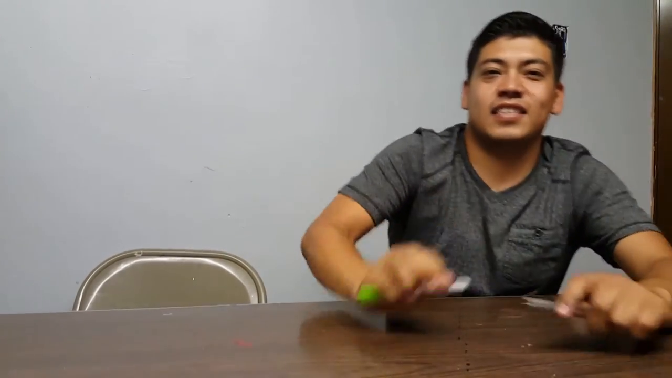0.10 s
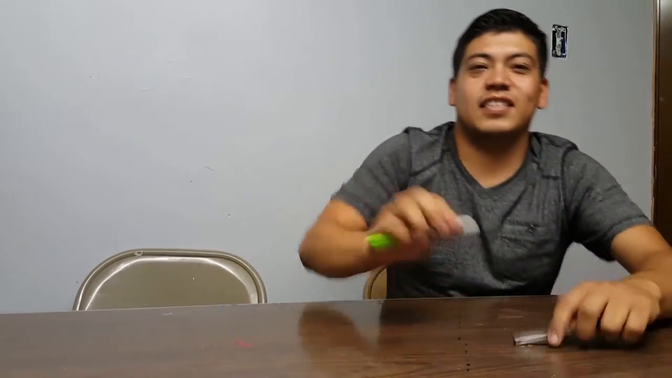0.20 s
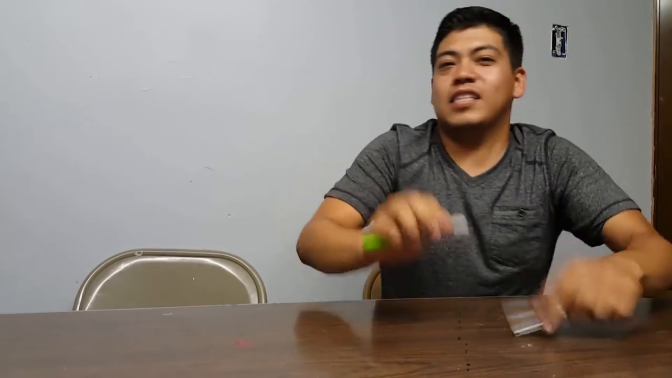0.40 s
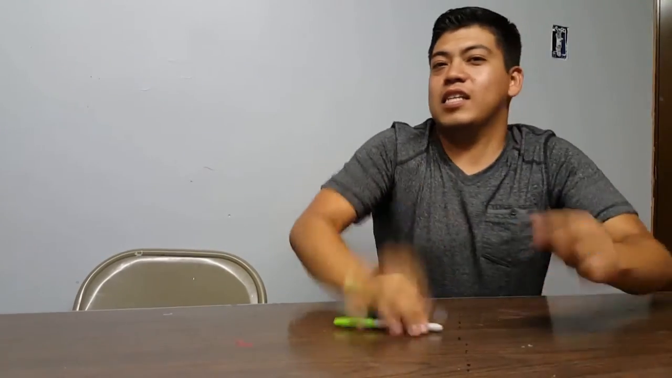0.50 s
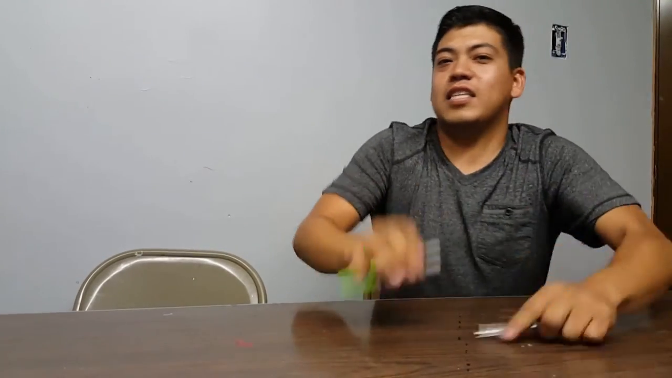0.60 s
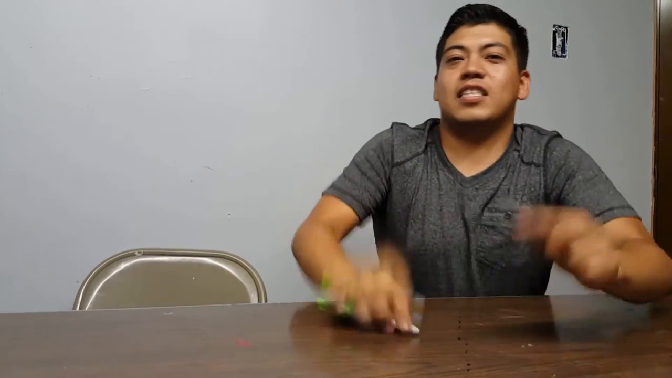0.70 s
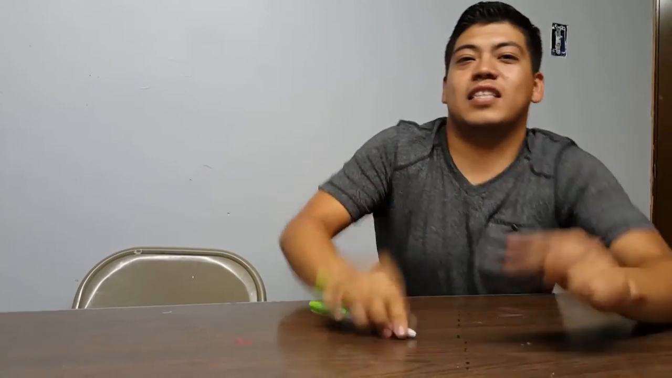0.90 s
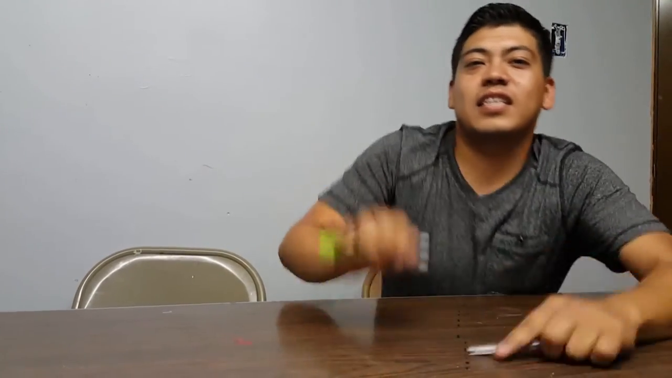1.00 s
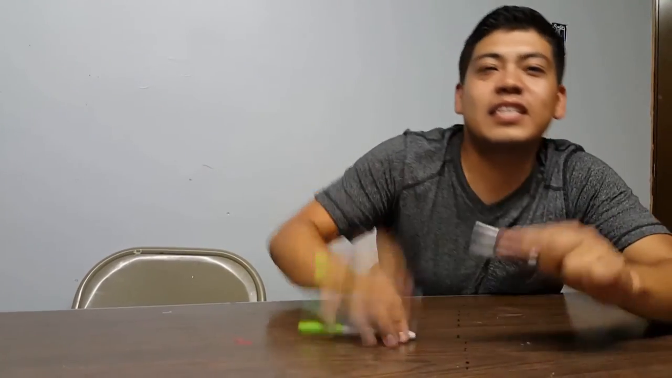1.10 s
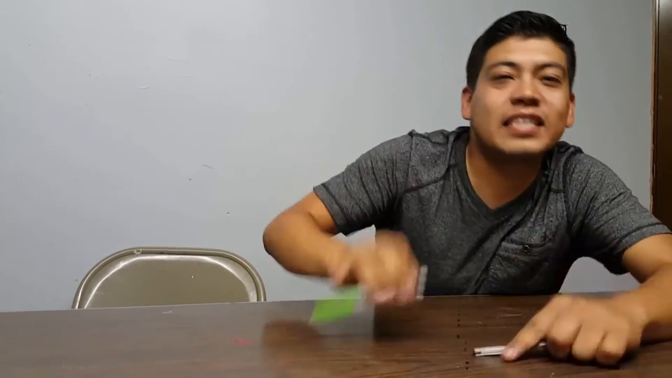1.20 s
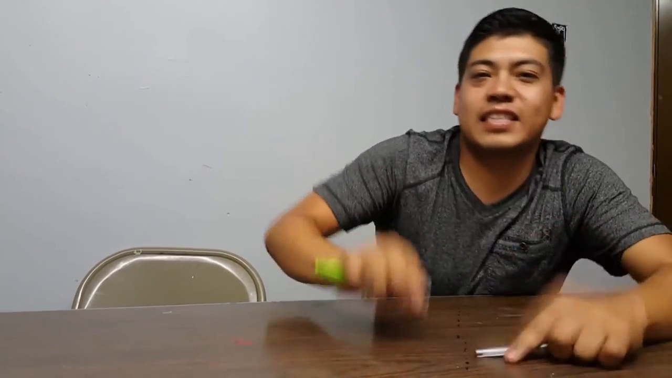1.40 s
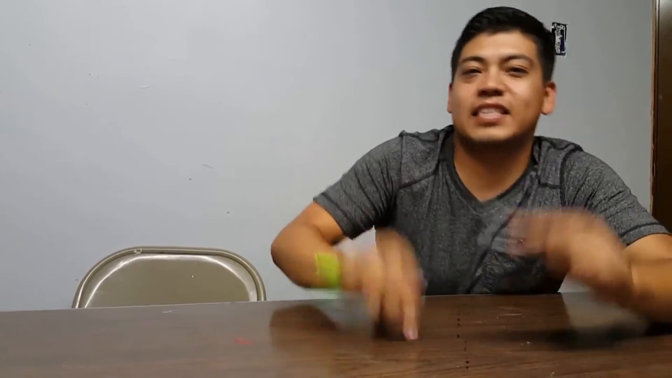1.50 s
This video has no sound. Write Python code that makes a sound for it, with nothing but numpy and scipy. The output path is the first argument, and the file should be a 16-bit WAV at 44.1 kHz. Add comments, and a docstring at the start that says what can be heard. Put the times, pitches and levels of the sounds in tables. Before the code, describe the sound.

Rapid, uneven pen taps play a beat on a wooden tabletop, close by in a small, echoing room. Two deep hand thumps come first among the taps, then a loud flat pen slap, and later a softer, bouncing one.

```python
"""Two pens drum a beat on a wooden table in a small bare room whose walls throw every blow back.
A pen tip opens: the plastic ticks, then the wood knocks and thuds. In the first half second the heel
of a hand thumps the table twice, and it booms and rattles. The tips keep tapping. At 0.7 s a pen is
slapped down flat with a loud crack; at 1.3 s comes a softer slap that bounces twice. The last tap
falls at 1.5 s and dies away into the hush of the room."""
import sys
import numpy as np
from scipy import signal
from scipy.fft import rfft, irfft
from scipy.io import wavfile

SR = 44100
rng = np.random.default_rng(int(sys.argv[2]) if len(sys.argv) > 2 else 0)


def dump_mix(stems):
    """Bounce the given channels to the path in sys.argv[1] as a 16-bit WAV at rate SR."""
    frames = np.atleast_2d(stems).T  # one column per channel
    limited = np.clip(frames, -1, 1)  # hard clip at full scale
    pcm = np.round(limited * 32767).astype(np.int16)
    wavfile.write(sys.argv[1], SR, pcm)


N = 68355
TIME = np.arange(SR) / SR  # one second

# Pen taps; the wood's pitch depends on where the tip lands. Each row: start in seconds, which pen,
# tick in dB, knock in dB, knock pitch in Hz, thud in dB, thud pitch in Hz, left minus right in dB.
TAPS = [(0.0466, "right", -12.5, -19.5, 646, -1.5, 235, 4),
        (0.2447, "right", -15.5, -25.5, 970, -12, 201, 1.5), (0.3081, "left", -26, -23, 1140, -51, 200, -6),
        (0.3945, "left", -22.5, -24, 1080, -38, 200, -2.5),
        (.4470, "right", -17, -21.5, 930, -23, 208, 0.5), (0.5018, "left", -8, -35, 1066, -31, 204, 4.5),
        (.6003, "left", -11, -19, 1151, -6, 199, 1.5), (0.6846, "right", -7, -11, 940, -20, 207, 2),
        (0.7668, "left", -13, -19, 1240, -6, 207, -3), (.8950, "right", -24, -26, 554, -12.5, 104, 1),
        (0.9876, "left", -17.5, -23.5, 1020, -18.5, 129, -3),
        (1.0881, "right", -29, -24.5, 510, -15, 217.5, -0.5),
        (1.1712, "left", -18, -24, 1234, -12, 222, -2), (1.2927, "right", -18, -23, 600, -8, 245, 1.5),
        (1.3752, "left", -10.5, -20, 1050, -7, 244, -3), (1.5120, "right", -25, -28.5, 1150, -12, 253.8, 1)]
# The tone of each pen's tick. Each row: frequency in Hz, level in dB.
TICK_TONE = {"right": [(300, -19.5), (1200, -3), (2300, 2), (3500, 2.5), (5200, 4), (8300, 3.5),
             (10500, -9.5), (12500, -8), (16000, 9)], "left": [(300, 7.5), (1800, -35.5), (3100, -5),
             (4300, -7), (6000, -5.5), (8500, -1.5), (10500, -10.5), (13500, -8.5), (16000, 6.5)]}
# The ring of each pen's barrel. Each row: pitch in Hz, dB relative to the tick, t60 in seconds.
# A t60 is the time a sound takes to fade by 60 dB.
BARREL_RING = {"right": (3526, -10.5, 0.0045), "left": (3034, -19.5, 0.015)}
# The tones of the wood's knock and thud. Each row: multiple of the pitch, level in dB.
KNOCK_TONE = [(.15, -16.5), (.45, -3), (.7, -1), (1, 2), (1.5, -7.5), (2.2, -8.5), (3.5, -24.5),
              (10, -40.5)]
THUD_TONE = [(.15, -74.5), (.35, -22.5), (.55, -6), (.8, 1), (1.15, -0.5), (1.6, -9.5), (2.3, -18),
             (3.6, -31), (9, -50.5), (35, -41)]
# For each pen: seconds from its tick until the wood answers.
WOOD_DELAY_S = {"right": .001, "left": .0045}
TICK_T60_S, TICK_SCATTER = 0.012, 1.2
HAND_DAMPING_DB_PER_S = 51  # resting hands quiet the table top


def pen_taps():
    """The plastic tip ticks first; a moment later the wood knocks, thuds and booms."""
    ticks, knocks, thuds, boom = np.zeros((4, 2, N))
    damped_ring = unit(table_ring("tip", rise_s=0.0075) * amp(-HAND_DAMPING_DB_PER_S * TIME))
    for s, pen, tick_db, knock_db, knock_hz, thud_db, thud_hz, pan_db in TAPS:
        add(ticks, s, amp(tick_db) * blow(TICK_TONE[pen], TICK_T60_S, TICK_SCATTER), pan_db)
        barrel_hz, barrel_db, barrel_t60 = BARREL_RING[pen]
        add(ticks, s, amp(tick_db + barrel_db) * ping(barrel_hz, barrel_t60), pan_db)
        wood_s = s + WOOD_DELAY_S[pen]
        add(knocks, wood_s, amp(knock_db - 6.5) * ping(knock_hz, t60=0.019))  # the wood's short note
        add(knocks, wood_s, amp(knock_db) * blow(pitched(KNOCK_TONE, knock_hz), t60=0.034, scatter=5.9))
        add(thuds, wood_s, amp(thud_db - 7) * click(pitched(THUD_TONE, thud_hz)))
        add(boom, wood_s, amp(thud_db - 3) * damped_ring)
    return room(ticks, tail_db=-5) + room(knocks, tail_db=-6) + room(thuds, tail_db=-2.5) + boom


# Flat slaps and bounces. Each row: start in seconds, then crack, push, tick and left minus right in dB.
SLAPS = [(0.691, 5.5, 7, -3.5, 1.5), (1.3002, -13, -21, -10.5, 11), (1.3071, -17, -41, -47, 2),
         (1.3160, -22, -27, -25, -18.5)]
# The tones of the crack and of the deep push on the table. Each row: frequency in Hz, level in dB.
CRACK_TONE = [(60, -47.5), (250, 7.5), (600, 2.5), (1000, 3), (1450, 4), (2000, -5), (2600, -2.5),
              (4000, -20), (6000, -28.5), (8500, -23.5), (10500, -26), (15000, -13)]
PUSH_TONE = [(20, -50), (50, 0.5), (100, 0.5), (190, 3), (350, -5), (700, -9), (2000, -38.5), (8000, -80)]


def pen_slaps():
    """The whole barrel cracks on the wood and pushes the top down."""
    cracks, pushes = np.zeros((2, 2, N))
    for s, crack_db, push_db, tick_db, pan_db in SLAPS:
        add(cracks, s, amp(crack_db) * blow(CRACK_TONE, t60=0.016, scatter=0.62), pan_db)
        add(cracks, s, amp(tick_db) * blow(TICK_TONE["right"], TICK_T60_S, TICK_SCATTER), pan_db)
        add(pushes, s, amp(push_db) * click(PUSH_TONE))
    return room(cracks, tail_db=-8) + room(pushes, tail_db=-14.5)


# Hand thumps. Each row: start in seconds, level in dB, rattle in dB, rattle length in seconds.
THUMPS = [(0.2449, 13.5, -42, 0.182), (0.4474, 14, -38.5, 0.276)]
# The tones of the hand's heel and of the rattle. Each row: frequency in Hz, level in dB.
HEEL_TONE = [(20, -44), (60, 5.5), (110, 3.5), (180, 7.5), (300, 0), (450, -9), (800, -19.5), (2000, -37),
             (8000, -46)]
RATTLE_TONE = [(100, -3), (450, 12), (800, 1.5), (1300, -0.5), (2000, -9.5), (2700, -12), (4000, -18),
               (8000, -25), (11000, -38), (15000, -33)]
RATTLE_HITS_PER_S, RATTLE_RISE_S, RATTLE_RELEASE_S, RATTLE_FADE_DB_PER_S = 2500, 0.0052, 0.018, 30.5


def hand_thumps():
    """A soft, heavy blow sets the table booming and its loose parts buzzing."""
    blows, boom, rattle = np.zeros((3, 2, N))
    for s, db, rattle_db, rattle_s in THUMPS:
        add(blows, s, amp(db - 15) * click(HEEL_TONE))
        add(boom, s, amp(db + 0.5) * table_ring("hand", rise_s=0.0069), pan_db=1.6)
        tiny_hits = wide_noise(SR) * (rng.random(SR) < RATTLE_HITS_PER_S / SR)
        buzz = np.sqrt(SR) * unit(shape_tone(tiny_hits, RATTLE_TONE))
        rise = 1 - np.exp(-TIME / RATTLE_RISE_S)
        fade = amp(rattle_db - RATTLE_FADE_DB_PER_S * TIME)
        release = np.exp(-np.maximum(TIME - rattle_s, 0) / RATTLE_RELEASE_S)
        add(rattle, s, rise * fade * release * buzz, pan_db=1.5)
    return room(blows, tail_db=6) + boom + room(rattle, tail_db=-3.5)


# The table's own notes. Each row: pitch in Hz, dB under the hand, dB under a pen tip, t60 in seconds.
TABLE_NOTES = [(73.4, -12, -48, 0.31), (86.7, -11, -26, 0.5), (124.6, -4, -23, 0.41),
               (145.4, -5, -38, 0.59), (153.7, 2.5, 0.5, 0.27), (167.94, -7.5, 0.5, 0.38),
               (209.4, -2.5, 1, 0.28), (223, -0.5, 4, 0.3), (249.95, -8, -0.5, 0.4),
               (267.8, -10, -5.5, 0.41), (316, -29, 0, 0.13), (315.3, -9.5, -8.5, 0.28),
               (357.4, -20.5, -16, 0.64), (435, -21, -17.5, 0.65), (490, -22, -20, 0.47),
               (560.5, -29.5, -14, 0.47)]


def table_ring(striker, rise_s):
    """The table top rings with many notes, building up as the blow spreads through it."""
    ring = np.zeros(SR)
    for hz, hand_db, tip_db, t60 in TABLE_NOTES:
        db = hand_db if striker == "hand" else tip_db
        ring += amp(db - 60 * TIME / t60) * np.sin(2 * np.pi * hz * TIME)
    return unit(ring * (1 - np.exp(-TIME / rise_s)))


def blow(tone, t60, scatter):
    """A click, then the brief, noisy ring of the struck parts; scatter is that ring's strength."""
    hit = scatter * unit(wide_noise(4096) * amp(-60 * TIME[:4096] / t60))
    hit[1, 0] += 1  # the click reaches the right microphone first
    hit[0, round(0.00007 * SR)] += 1
    return unit(signal.fftconvolve(hit, click(tone)[None], axes=1))


def ping(hz, t60):
    """One quickly dying note."""
    return unit(np.sin(2 * np.pi * hz * TIME) * amp(-60 * TIME / t60))


def click(tone):
    """The sharpest click that has this tone."""
    hz = np.fft.rfftfreq(8192, 1 / SR)
    cepstrum = irfft(np.log(amp(look_up(tone, hz))))
    half = len(cepstrum) // 2
    cepstrum[1:half] *= 2  # folding onto the first half packs the energy at the start
    cepstrum[half + 1:] = 0
    return unit(irfft(np.exp(rfft(cepstrum)))[:half])


# Single wall echoes. Each row: delay in seconds, left gain, right gain.
ECHOES = [(.0062, 0.063, 0.058), (0.0102, 0.049, 0.34), (0.0162, 0.16, 0.095), (0.0202, 0.19, 0.16)]
# How long the room rings. Each row: frequency in Hz, t60 in seconds.
ROOM_T60 = [(80, 0.32), (250, 0.56), (600, 0.28), (1500, 0.24), (4000, 0.27), (8000, 0.26), (15000, 0.23)]
# The tail's tone; a small room holds little deep bass. Each row: frequency in Hz, level in dB.
ROOM_TONE = [(30, -10), (70, -7), (130, 5.5), (300, 1), (9000, -1), (15000, -1.5)]
ROOM_RISE_S = 0.0036


def room(x, tail_db):
    """The sound arrives directly, then as a few wall echoes and a blurred tail of many more."""
    hz, t, spectrum = signal.stft(wide_noise(SR), SR, nperseg=512)
    fade_db = look_up(ROOM_TONE, hz)[:, None] - 60 * t / look_up(ROOM_T60, hz)[:, None]
    tail = signal.istft(spectrum * amp(fade_db), SR)[1][:, :SR]
    rise = 1 - np.exp(-(TIME / ROOM_RISE_S) ** 2)
    response = amp(tail_db) * unit(tail * rise)
    response[:, 0] += 1  # the direct sound
    for s, left, right in ECHOES:
        add(response, s, np.array([[left], [right]]))
    return signal.fftconvolve(x, response, axes=1)[:, :N]


# The tones of the room's hush and lingering ring. Each row: frequency in Hz, level in dB.
HUSH_TONE = [(20, -41), (70, -8), (170, -15.5), (280, 6), (450, -9), (1000, -23.5), (3000, -26),
             (8000, -53), (16000, -19)]
LINGER_TONE = [(20, -34), (70, 9), (180, 5.5), (300, 1.5), (500, -8), (1200, -13.5), (2700, -21),
               (5000, -32.5), (15000, -45)]
HUSH_DB, LINGER_DB, LINGER_FADE_DB_PER_S = -72.5, -46.5, 9


def background():
    """The room's steady hush, and a low, fading noise for the dying ring of earlier beats."""
    hush = amp(HUSH_DB) * unit(shape_tone(wide_noise(N), HUSH_TONE))
    fade = amp(LINGER_DB - LINGER_FADE_DB_PER_S * np.arange(N) / SR)
    linger = fade * unit(shape_tone(wide_noise(N), LINGER_TONE))
    return np.sqrt(N) * (hush + linger)


# How alike left and right are. Each row: frequency in Hz, likeness from 0 (unrelated) to 1 (the same).
LIKENESS = [(100, 0.97), (200, 1), (350, 0.88), (700, 0.12), (2000, 0.05), (15000, 0.044)]


def wide_noise(size):
    """Noise from all round: left and right are alike in the bass, unrelated in the treble."""
    a, b = rfft(rng.standard_normal((2, size)))
    same = np.clip(look_up(LIKENESS, np.fft.rfftfreq(size, 1 / SR)), 0, 1)
    mid, side = a * np.sqrt((1 + same) / 2), b * np.sqrt((1 - same) / 2)
    return irfft(np.array([mid + side, mid - side]), size)


def amp(db):
    """Turns decibels into a gain."""
    return 10 ** (np.asarray(db) / 20)


def unit(x):
    """Scales a sound to an average energy of 1 per channel."""
    return x / np.sqrt(np.mean(np.sum(x ** 2, -1)) + 1e-20)


def look_up(table, hz):
    """Reads between a table's rows on a log-frequency scale."""
    row_hz, value = np.transpose(table)
    return np.interp(np.log(hz + 1), np.log(row_hz), value)


def pitched(tone, hz):
    """Places a tone at a pitch."""
    return np.array(tone) * [hz, 1]


def shape_tone(x, tone):
    """Filters a stereo sound to give it this tone."""
    return signal.fftconvolve(x, click(tone)[None], axes=1)[:, :x.shape[1]]


def add(mix, s, sound, pan_db=0):
    """Mixes a sound in at s seconds; a positive pan_db moves it left."""
    part = mix[:, max(round(s * SR), 0):][:, :sound.shape[-1]]
    part += (sound * amp([[pan_db / 2], [-pan_db / 2]]))[:, :part.shape[1]]


def scene():
    """Pens and hand on the table, in the room."""
    return pen_taps() + pen_slaps() + hand_thumps() + background()


# The microphone's tone. Each row: frequency in Hz, gain in dB.
MICROPHONE_TONE = [(20, -2.5), (11000, 3.5), (14000, 3), (15300, -15), (15900, -21), (17000, -23)]
OVERLOAD_LEVEL, TREBLE_LIMIT_HZ = 0.36, 16400


def record(dry):
    """The microphone rounds off the hardest crack and loses the very top of the treble."""
    rounded = OVERLOAD_LEVEL * np.tanh(dry / OVERLOAD_LEVEL)
    heard = shape_tone(rounded, MICROPHONE_TONE)
    low_pass = signal.firwin(255, TREBLE_LIMIT_HZ, window=("kaiser", 9), fs=SR)
    return signal.oaconvolve(heard, low_pass[None], "same")


dry = scene()
out = record(dry)
dump_mix(out)
```